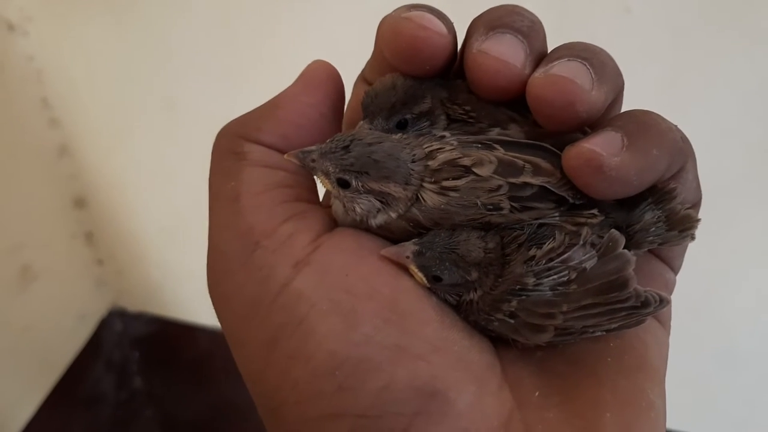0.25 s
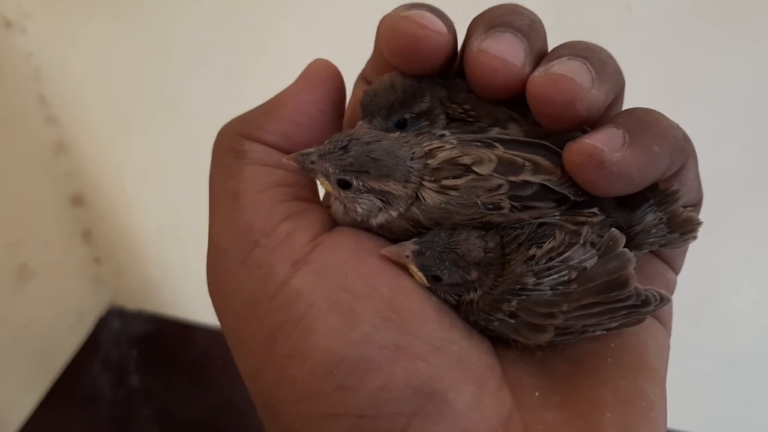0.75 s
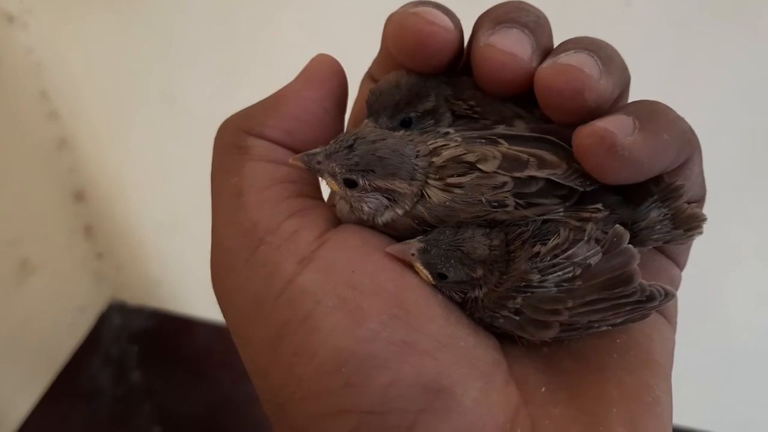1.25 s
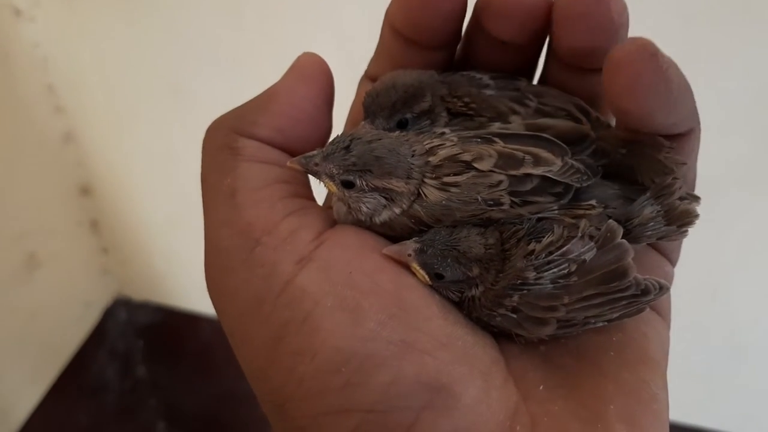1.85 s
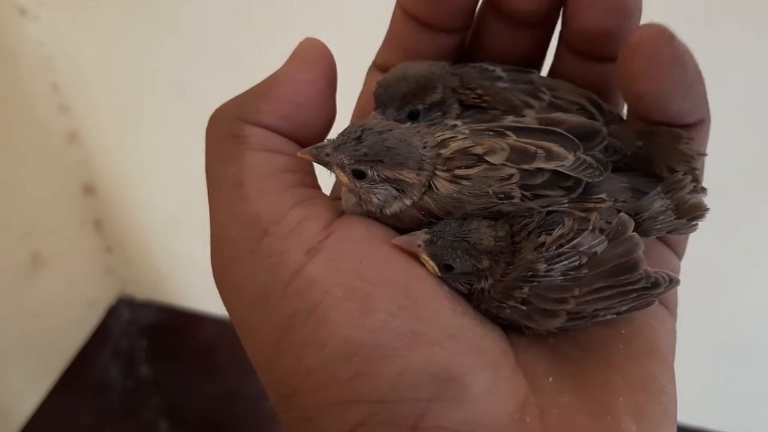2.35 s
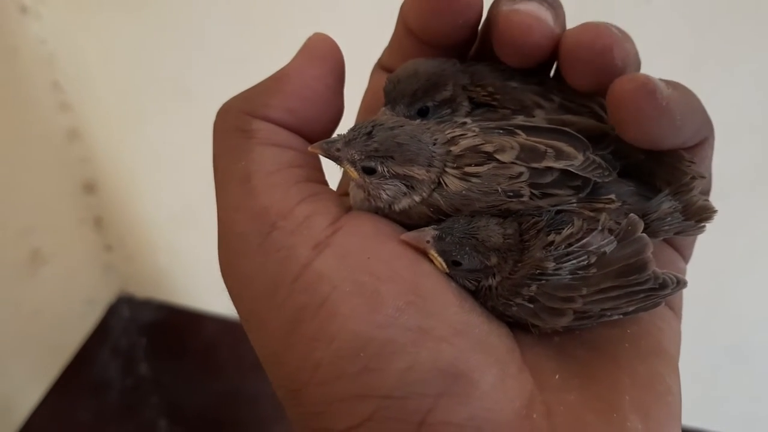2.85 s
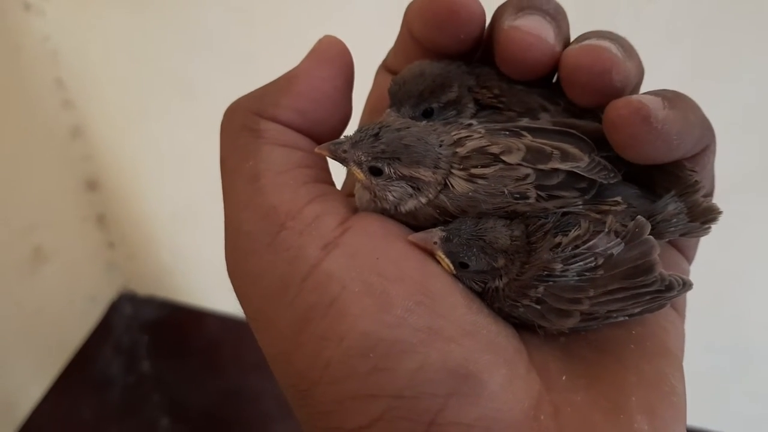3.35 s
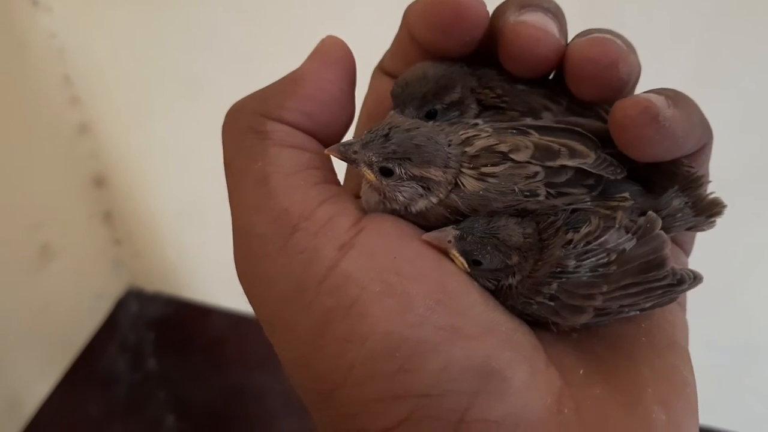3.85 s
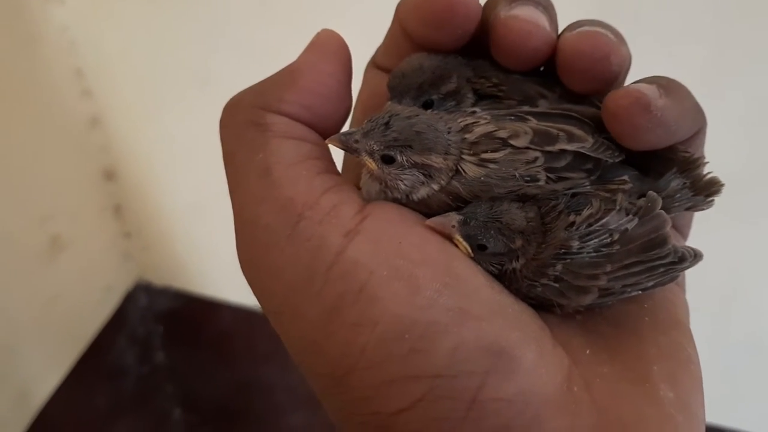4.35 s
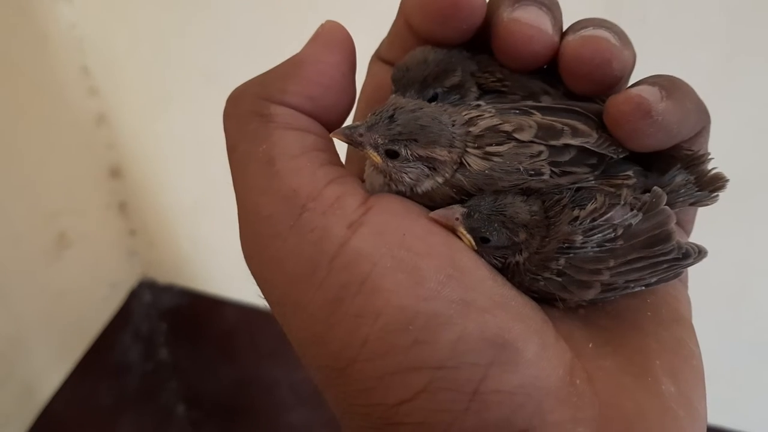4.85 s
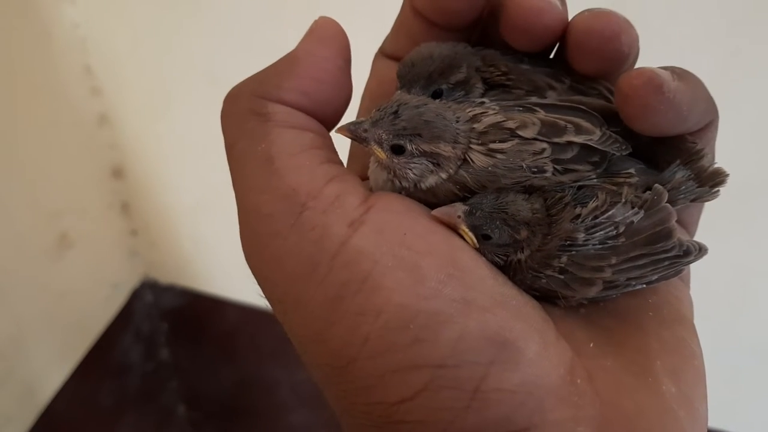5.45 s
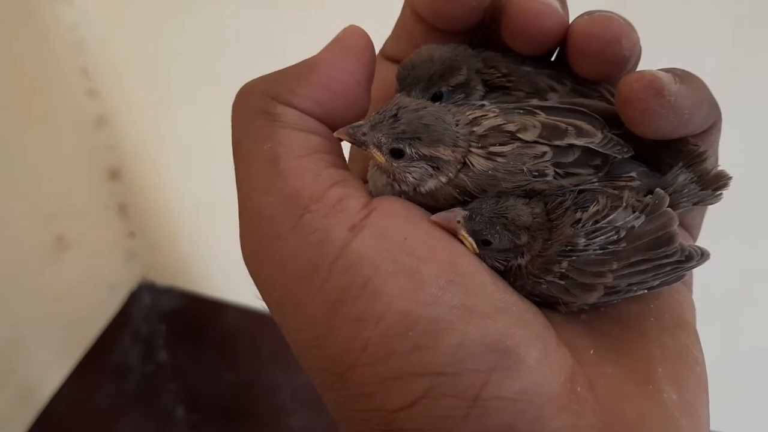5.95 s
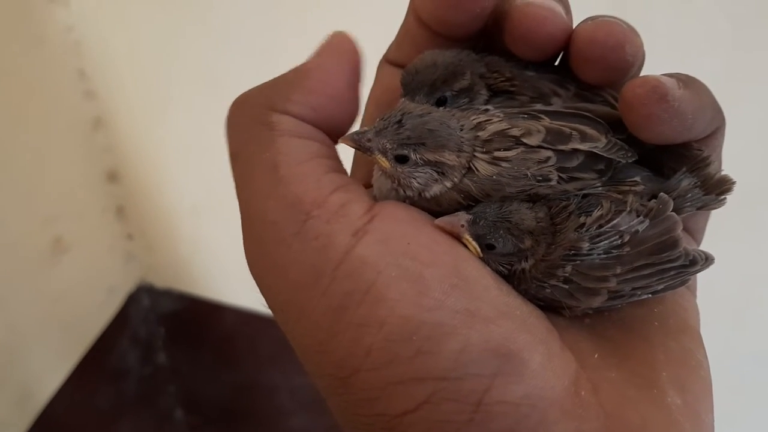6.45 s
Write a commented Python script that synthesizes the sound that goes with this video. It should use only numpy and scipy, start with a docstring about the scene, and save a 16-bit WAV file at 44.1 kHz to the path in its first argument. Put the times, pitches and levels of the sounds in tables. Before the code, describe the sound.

Short sparrow chirps and hoarse double rasps ring off bare walls, with brief pauses over a low room hush.

```python
"""A bare, echoing room where young sparrows call: bright arched chirps, soft falling peeps and
harsh rasps in pairs. Their membranes trill for the whistles and clatter for the rasps; hard walls
smear every call into a long tail. Under them lie a low room hush and very faint, slowly sinking
hoots, perhaps a dove far outside. A noise suppressor lets the hush swell whenever the sparrows call."""
import sys
import numpy as np
from scipy import signal
from scipy.fft import rfft, irfft
from scipy.io import wavfile
from scipy.ndimage import uniform_filter1d

SR = 44100
rng = np.random.default_rng(int(sys.argv[2]) if len(sys.argv) > 2 else 0)


def generate_wav(sig):
    """Save sig (samples, or channels by samples) to the path in sys.argv[1] as 16-bit PCM at SR."""
    pcm = np.round(np.clip(np.atleast_2d(sig).T, -1, 1) * 32767).astype(np.int16)
    wavfile.write(sys.argv[1], SR, pcm)


N = 295029
LEAD = SR // 2  # samples of run-up before time zero


def chirp(corners, jitter, octave, trill_hz=110, trill_depth=.075, ceiling_hz=5200, flutter_db=3,
          second_db=-20, third_db=-29, half_db=-28, air_db=-19.5):
    """One whistle: the membrane trills and shakes, adding weak overtones and air noise."""
    times_s, pitch_hz, level_db = np.transpose(corners)
    t = np.arange(times_s[0], times_s[-1], 1 / SR)
    size = len(t)
    # opening slide: unsteady pitch, weaker fundamental, more octave and air
    opening = np.exp(-((t - times_s[0]) / .043) ** 4)
    trill_cycles = np.cumsum(trill_hz * (1 + .25 * wander(size, 40.6))) / SR
    trill = np.sin(2 * np.pi * (trill_cycles + rng.random()))
    shake = (trill_depth * trill + jitter * wander(size, 650)) * (1 + .5 * opening)
    hz = np.minimum(np.interp(t, times_s, pitch_hz) * (1 + shake), ceiling_hz)  # membrane's stretch limit
    phase = 2 * np.pi * np.cumsum(hz) / SR
    tone = (1 - .24 * opening) * np.sin(phase)
    tone += (amp(second_db) + octave * opening) * np.sin(2 * phase)
    tone += amp(third_db) * np.sin(3 * phase) + amp(half_db) * np.sin(phase / 2)
    tone += (amp(air_db) + .3 * opening) * rng.standard_normal(size)
    gain = amp(np.interp(t, times_s, level_db) + flutter_db * wander(size, 300))
    return times_s[0], tone * gain * signal.windows.tukey(size, .1)


def arch(start_s, length_s, rise_s, fall_s, top_hz, level_db, ending_db):
    """Chirp corners (s, Hz, dB): slides up as it swells, holds the top note, drops ever faster."""
    end_s = start_s + length_s
    return [(start_s, 2750, level_db - 50),
            (start_s + .7 * rise_s, 3750, level_db - 11),
            (start_s + rise_s, top_hz, level_db),
            (end_s - fall_s, top_hz, level_db),
            (end_s - fall_s / 2, .87 * top_hz, (level_db + ending_db) / 2),
            (end_s, 3200, ending_db - 4)]


def peep(start_s, length_s, top_hz, level_db, ending_db, rise_s=.053, sink_s=.024, low_hz=3800):
    """Peep corners (s, Hz, dB): swells to the top note, falters, slides to a low ending."""
    top_s = start_s + rise_s
    return [(start_s, 4000, level_db - 36),
            (start_s + rise_s / 2, top_hz, level_db - 13),
            (top_s, top_hz, level_db),
            (top_s + sink_s, (top_hz + low_hz) / 2, level_db - 12),
            (top_s + 2 * sink_s, low_hz, ending_db),
            (start_s + length_s, 3150, ending_db - 4)]


def sparrow_whistles():
    """Loud chirps and duller, soft peeps, filtered by windpipe and beak."""
    # Loud chirps. Each row: start, length, rise and fall in s, top pitch in Hz,
    # relative levels of top and ending in dB.
    chirp_calls = [(0.73, 0.15, 0.064, 0.038, 4580, -19, -26),
                   (1.338, .157, .067, 0.033, 4615, -12.5, -25.5),
                   (3.365, 0.14, 0.056, 0.034, 4660, -12.5, -18),
                   (4.682, .182, .067, 0.062, 4810, -18, -14.5), (5.25, .15, 0.071, .038, 4749, -15.5, -17)]
    # Soft peeps. Each row: start and length in s, top pitch in Hz, relative levels of top and ending in dB.
    peep_calls = [(-.225, .19, 4500, -31.5, -44), (1.658, 0.15, 4483, -24, -33.5),
                  (4.274, .146, 4697, -31, -33.5), (6.293, 0.15, 4744, -30, -33.5)]
    # Treble loss of soft calls. Each row: frequency in Hz, gain in dB.
    peep_tilt = [(5000, 1), (7000, -2), (10000, -4), (14000, -9)]
    # Windpipe and beak response. Each row: frequency in Hz, gain in dB.
    beak = [(250, -51.5), (1000, -27), (2300, -8.5), (3000, -7.5), (3700, -5.5), (4500, -3), (5150, -3.5),
            (5480, -8.5), (6200, 6), (7100, 2.5), (8500, -16), (10200, -10.5), (11200, -8.5), (15000, -10)]
    chirps = track(chirp(arch(*row), jitter=.052, octave=1) for row in chirp_calls)
    peeps = track(chirp(peep(*row), jitter=.065, octave=.12) for row in peep_calls)
    return colour(chirps + colour(peeps, peep_tilt), beak)


def rasp(start_s, level_db, start_hz, end_hz, length_s=.1, pulse_hz=420, dulling_db=17, swell_db=2):
    """Membranes clatter irregularly; the noise dulls as a hoarse whistle slides down through it."""
    # Rasp noise spectrum. Each row: frequency in Hz, relative density in dB.
    spectrum = [(300, -65), (800, -31.5), (1020, -14.5), (1350, -8), (1850, -7.5), (2010, -14), (2600, -6),
                (3300, -2), (5000, -0.5), (7200, -8.5), (9300, -32), (11800, -16), (13000, -27.5),
                (15500, -42.5)]
    size = int(length_s * SR)
    progress = np.arange(size) / size
    clatter_hz = pulse_hz * (1 + .3013 * wander(size, 200))
    clatter = 1 + np.cos(2 * np.pi * np.cumsum(clatter_hz) / SR)
    noise = unit(colour(clatter * rng.standard_normal(size), spectrum))
    low = colour(noise, [(2000, -1), (2400, -75.5)])
    high = (noise - low) * amp(2 - dulling_db * progress ** 1.5)
    noise = low * amp(swell_db * (progress - 1)) + high
    slide_hz = end_hz + (start_hz - end_hz) * (1 - progress) ** 1.6
    hz = slide_hz * (1 + .028 * wander(size, 500))
    whistle = np.sin(2 * np.pi * np.cumsum(hz) / SR)
    whistle *= np.interp(progress, [0, .25, .5, .75, 1], [.5, .55, 1.1, .95, .3])
    edges = np.minimum(progress / .088, 1) * np.minimum((1 - progress) / .051, 1)
    return start_s, amp(level_db) * edges * (noise + whistle)


def room(x, direct_db=-7, early_db=-8, build_s=.0042):
    """Weak direct path, eight wall reflections a side and a dense tail whose treble dies first."""
    # Room decay. Each row: frequency in Hz, T60 in s.
    t60 = [(500, 1.4), (1400, 1.305), (3000, 0.78), (4600, 0.62), (7000, 0.38), (14000, 0.26)]
    size = SR * 3 // 2
    hz, t, tail = signal.stft(rng.standard_normal((2, size)), SR, nperseg=256)
    tail *= amp(-60 * t / read(t60, hz)[:, None]) * (1 - np.exp(-t / build_s))
    response = signal.istft(tail, SR, nperseg=256)[1][:, :size]
    response /= np.linalg.norm(response, axis=1, keepdims=True)
    wall_delays = rng.integers(SR // 400, SR // 30, size=(2, 8))
    for side, delay in enumerate((SR // 2450, 0)):  # sound reaches the right side first
        response[side, delay] += amp(direct_db)
        response[side, wall_delays[side]] += amp(early_db) * rng.choice([-1, 1], size=8) / np.sqrt(8)
    return signal.fftconvolve(x[None], response, axes=1)[:, :LEAD + N]


def hoot(start_s, length_s, pitch_hz, level_db, waver=.016):
    """A soft, far, nearly pure note."""
    size = int(length_s * SR)
    phase = 2 * np.pi * np.cumsum(pitch_hz * (1 + waver * wander(size, 25))) / SR
    return start_s, amp(level_db) * unit(np.sin(phase) * signal.windows.tukey(size, .5))


def hush(level_db=-67, lean_db=.6344, hiss_db=-85):
    """Low room noise, alike on both sides in the bass, and thin microphone hiss."""
    # Room noise spectrum. Each row: frequency in Hz, relative density in dB.
    hush_spectrum = [(15, -75.5), (25, -37), (43, -14.5), (130, -12.5), (177, -17), (241, -9), (449, -6.5),
                     (482, -10.5), (556, -14.5), (690, -13.5), (759, -15.5), (1410, -21.5), (1880, -22),
                     (3940, -35), (7500, -33.5), (9750, -63.5), (16500, -120)]
    # Stereo likeness of the hush. Each row: frequency in Hz, left-right correlation.
    likeness = [(60, .76), (300, .82), (600, .5), (1200, .1), (5000, 0)]
    # Microphone hiss spectrum. Each row: frequency in Hz, relative density in dB.
    hiss_spectrum = [(7000, -36.5), (9000, -7), (11000, 0), (13000, 3), (16000, 1)]
    left, independent = rfft(rng.standard_normal((2, N)))
    correlation = read(likeness, np.fft.rfftfreq(N, 1 / SR))
    right = correlation * left + np.sqrt(1 - correlation ** 2) * independent
    pair = irfft(np.array([left, right]), N)
    low = amp(level_db) * unit(colour(pair, hush_spectrum)) * amp([[lean_db], [-lean_db]])
    return low + amp(hiss_db) * unit(colour(rng.standard_normal((2, N)), hiss_spectrum))


def suppressor(x, split_hz=750, shut_db=-63, span_db=30, lift_db=5.5, follow_s=.065):
    """A noise suppressor opens on the sparrows' calls and lifts the low hush with them."""
    low = irfft(rfft(x) / (1 + (bins(x) / split_hz) ** 6), N)
    high_power = uniform_filter1d(((x - low) ** 2).mean(0), size=1000)
    high_db = 10 * np.log10(abs(high_power) + 1e-12)
    target = np.clip((high_db - shut_db) / span_db, 0, 1)
    pole = np.exp(-1 / (follow_s * SR))
    opened = signal.lfilter([1 - pole], [1, -pole], target)
    return x + low * (amp(lift_db * opened) - 1)


def amp(db):
    """Decibels to gain."""
    return 10 ** (np.asarray(db) / 20)


def unit(x):
    """Scales to rms 1."""
    return x / np.sqrt(np.mean(x ** 2) + 1e-20)


def read(points, hz):
    """Interpolates a table on a log-frequency axis."""
    table_hz, value = np.transpose(points)
    return np.interp(np.log(hz + 1), np.log(table_hz + 1), value)


def bins(x):
    """FFT bin frequencies of x in Hz."""
    return np.fft.rfftfreq(x.shape[-1], 1 / SR)


def colour(x, points):
    """Filters by a table of (Hz, dB)."""
    return irfft(rfft(x) * amp(read(points, bins(x))), x.shape[-1])


def wander(size, hz):
    """Random motion of rms about 1, low-passed at hz."""
    x = rng.standard_normal(SR)
    return unit(irfft(rfft(x) / (1 + (bins(x) / hz) ** 4), SR))[:size]


def track(events):
    """Sums (start in s, sound) pairs on a track that begins with the run-up."""
    mix = np.zeros(LEAD + N)
    for start_s, sound in events:
        part = mix[LEAD + round(start_s * SR):][:len(sound)]
        part += sound[:len(part)]
    return mix


def scene(rasp_db=-2, hoot_direct_db=-3, hoot_room_db=-11):
    """All calls sound through one room, over its hush."""
    # Rasps. Each row: start in s, relative level in dB, whistle start and end pitch in Hz.
    rasp_calls = [(-.3, -40.5, 4420, 2740), (.92, -28, 4446, 2543), (1.076, -29.5, 4220, 2734),
                  (3.123, -31.5, 4135, 2423), (3.264, -28, 4700, 2706), (4.772, -30.5, 4323, 2502),
                  (4.912, -29.5, 4450, 2650), (6.416, -29.5, 4503, 2530), (6.566, -31, 4354, 2615)]
    # Far hoots. Each row: start and length in s, pitch in Hz, relative level in dB.
    hoot_calls = [(0.722, 0.53, 592, -71), (1.315, 0.31, 560, -74.5), (1.993, 0.21, 563.4, -73.5),
                  (2.35, .22, 557.7, -67.5), (2.58, .24, 562, -73.5), (3.0, 0.32, 540.4, -68.5),
                  (3.619, 0.22, 552.5, -70.5), (3.937, 0.34, 559, -68.5), (4.637, 0.25, 545.4, -70.5),
                  (5.248, 0.3, 533, -68.5), (5.561, 0.4, 545.6, -66), (6.3, 0.3, 530.5, -71)]
    # Stereo balance of the calls. Each row: frequency in Hz, left minus right in dB.
    balance = [(600, 13), (1300, -2.5), (2400, 0.5), (4400, -4), (6500, -3.5), (9000, 6.5), (15000, -1.5)]
    whistles = sparrow_whistles()
    rasps = track(rasp(*row) for row in rasp_calls)
    hoots = track(hoot(*row) for row in hoot_calls)
    calls = room(whistles + amp(rasp_db) * rasps + amp(hoot_room_db) * hoots)
    calls += amp(hoot_direct_db) * hoots
    lean_db = read(balance, bins(calls)) / 2
    calls = irfft(rfft(calls) * amp([lean_db, -lean_db]), LEAD + N)
    return calls[:, LEAD:] + hush()


def record(dry, edge_hz=15800):
    """Noise suppressor, then a steep low-pass."""
    lowpass = signal.firwin(511, edge_hz, window=("kaiser", 9), fs=SR)
    return signal.oaconvolve(suppressor(dry), lowpass[None], "same")


dry = scene()
out = record(dry)
generate_wav(out)
```